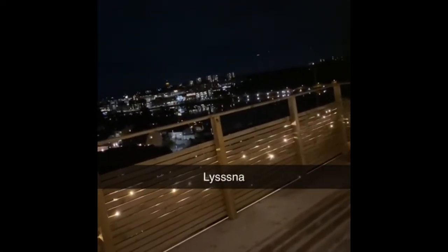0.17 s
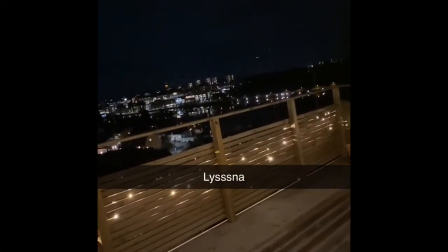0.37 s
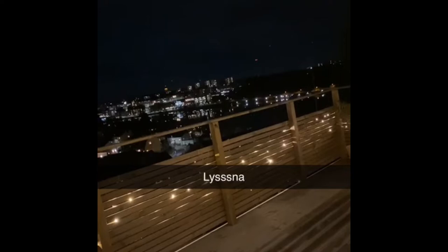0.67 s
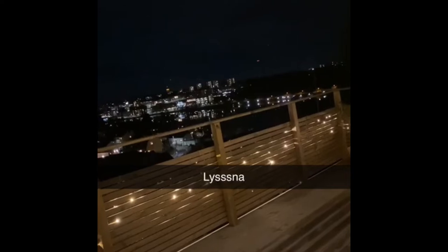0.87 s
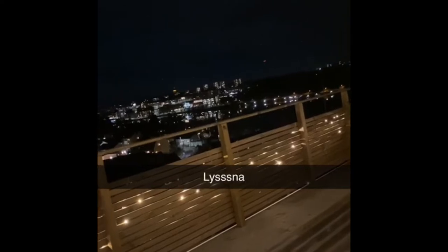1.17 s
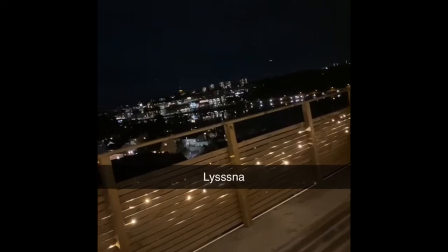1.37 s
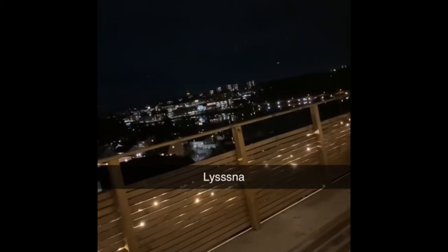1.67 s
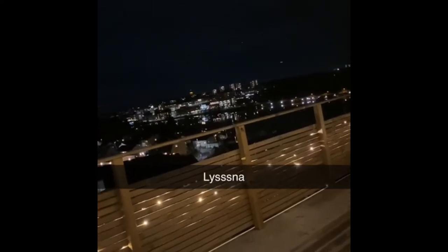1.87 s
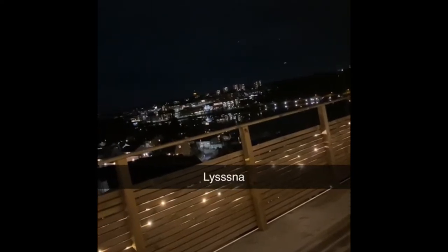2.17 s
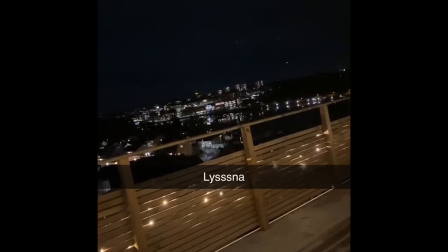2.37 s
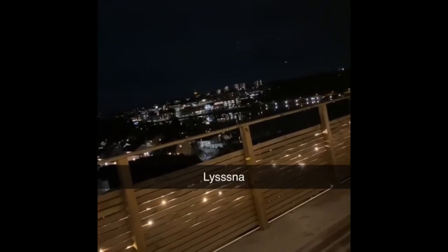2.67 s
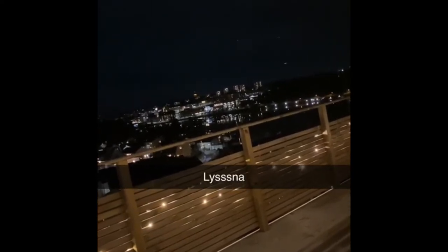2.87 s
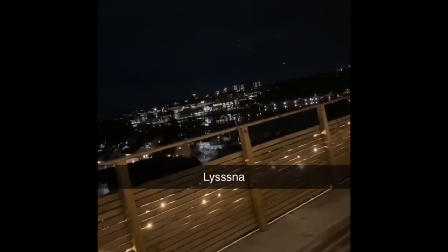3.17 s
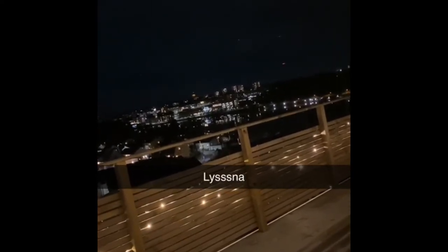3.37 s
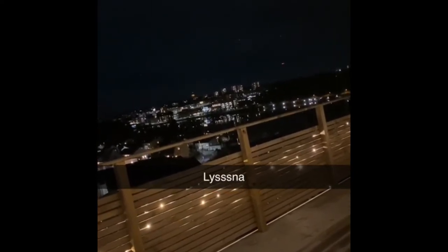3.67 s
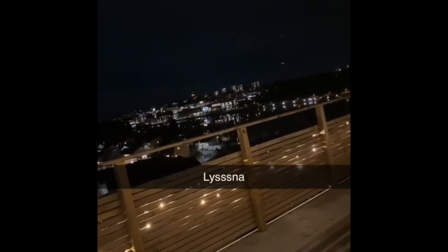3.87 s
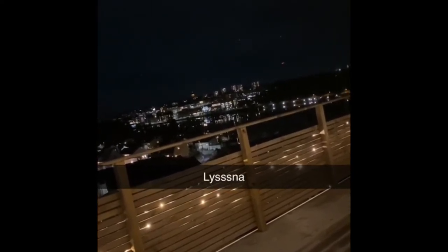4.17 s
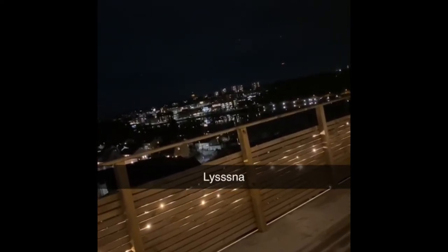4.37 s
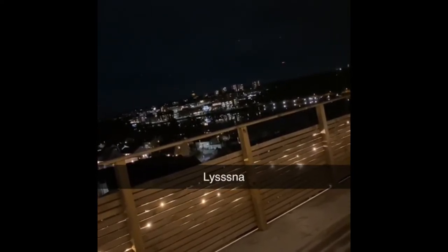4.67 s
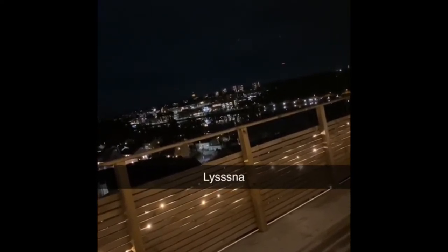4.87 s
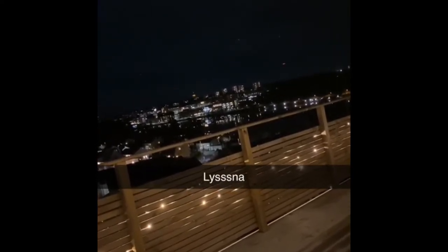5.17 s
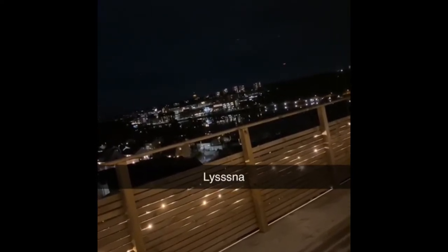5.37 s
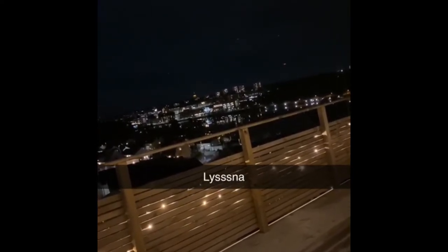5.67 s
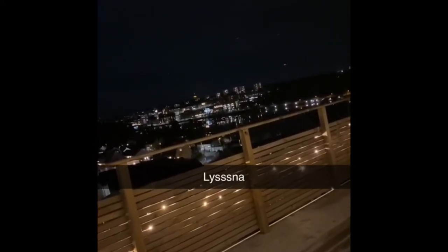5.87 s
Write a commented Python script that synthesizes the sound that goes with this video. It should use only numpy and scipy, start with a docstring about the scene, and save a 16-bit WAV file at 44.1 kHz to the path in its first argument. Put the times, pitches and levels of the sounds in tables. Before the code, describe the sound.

A fox screams three times at a distance, outdoors at night. Each scream starts as a hoarse rasp, clears into a high held note and falls away, echoing off houses and a hillside. Between the second and third screams, a small object gives one sharp click close to the microphone. A quiet, low town rumble runs underneath throughout.

```python
"""A red fox screams three times, some way off below a wooden terrace above a quiet town at night.
Each scream starts as a hoarse rasp, clears into a high held note and falls: the vocal folds shake
chaotically, lock on a pitch, then slacken, all coloured by the throat. Houses and hillside throw it back.
The town rumbles steadily, and close by something small clicks and rings."""
import sys
import numpy as np
from scipy import signal
from scipy.fft import rfft, irfft, next_fast_len
from scipy.io import wavfile
from scipy.ndimage import uniform_filter1d

SR = 44100
rng = np.random.default_rng(int(sys.argv[2]) if len(sys.argv) > 2 else 0)


def transcribe(signal):
    """Save signal, clipped to [-1, 1], as a 16-bit WAV file at the path in sys.argv[1]."""
    frames = np.atleast_2d(signal).T
    limited = np.clip(frames, -1, 1)
    pcm = np.round(limited * 32767).astype(np.int16)
    wavfile.write(sys.argv[1], SR, pcm)


N = 266011

# Tone of the distant town. Each row: frequency in Hz, relative level in dB.
TOWN_SPECTRUM = [(12, -46), (20, -14), (38, -3), (102, -0.5), (157, -5.5), (241, -8), (370, -19),
                 (401, -15.5), (649, -17.5), (944, -15.5), (1750, -34.5), (2160, -36.5), (3410, -41),
                 (6150, -45), (12000, -57), (15600, -83.5), (22000, -120)]
# Humps of far traffic and tyres on that tone. Each row: centre in Hz, width in Hz, boost or cut in dB.
TRAFFIC_HUMPS = [(90, 30, 0.5), (336, 86, 2), (411, 41, 2.5), (577, 60, -3), (856, 120, -3)]
# Small clicks close by. Each row: start in seconds, level in dB, decay in seconds, tilt in dB per octave.
CLICK_HITS = [(1.6448, -67.5, 0.005, 8), (4.9034, -30, 0.0033, 9), (4.9061, -31.5, 0.0035, -1),
              (4.9092, -29, 0.00097, -7), (5.6058, -63, .002, 3)]
# Tone of a click before its tilt. Each row: frequency in Hz, relative level in dB.
CLICK_SPECTRUM = [(290, -53), (500, -1), (1890, 7), (2190, -5.5), (2890, 5.5), (3670, -8), (4140, 9),
                  (5190, -8), (5850, -4), (6420, -3.5), (6770, -7), (9960, -11), (12000, -25.5),
                  (15600, -54), (22000, -120)]
# Ring of the clicked object. Each row: frequency in Hz, relative level in dB, seconds to fall 60 dB.
OBJECT_MODES = [(455, -26.5, 0.19), (576, -32, 0.2), (952, -25.5, 0.058), (1500, -27, 0.037),
                (1960, -31, 0.059), (4060, -39, 0.025), (5950, -36, .025)]
# Echoes off houses and hillside. Each row: delay in seconds, level in dB, smear in seconds,
# extra level for the low part of the voice in dB.
FAR_ECHOES = [(0.145, -1.5, 0.017, 1), (0.168, -14, 0.051, -5.5), (0.24, -16, 0.032, 2),
              (0.405, -14.5, .035, 3.5), (0.61, -24, 0.078, 6.5)]
# Bounce off ground and fences near the fox, with the same columns.
NEAR_ECHOES = [(0.003, -3, .028, -2)]
# The valley's long tail. Each row: frequency in Hz, seconds to fall 60 dB.
VALLEY_DECAY = [(800, 0.49), (2100, 3), (4300, 1.45), (7000, 1.5)]
# Throat resonances: low for rasp and moan, main for the note, upper for its overtones.
# Each row: centre in Hz, width in Hz, relative level in dB.
LOW_FORMANTS = [(996, 290, -8.5), (1113, 220, 0)]
MAIN_FORMANTS = [(1823, 690, -4), (2110, 160, -5)]
UPPER_FORMANTS = [(2950, 460, -4.5), (3540, 1200, 1), (4164, 320, 4.5), (4820, 600, -3), (5450, 340, -8.5),
                  (6130, 590, -15)]
# The screams. Each row: start and length in seconds, target pitch in Hz, climb in seconds, overshoot in
# Hz, hoarse stretch in seconds, roughness from 0 to 1, relative levels of rasp, hoarse note and clear
# note in dB, seconds from the start to the top of the swell, swell in dB.
FOX_SCREAMS = [(0.674, 0.81, 2200, 0.13, 0, 0.175, 0.86, -42.5, -49.5, -53.5, 0.56, 7.5),
               (3.426, 0.74, 2203, 0.082, 40, 0.095, 0.86, -42, -52, -54, 0.275, 15),
               (5.714, 0.75, 2172, 0.105, 0, 0.225, 0.5, -53.5, -48.5, -49, 0.27, 7.5)]

# The pitch scoops up from a fraction under the note, may overshoot, holds, then collapses.
SCOOP, OVERSHOOT_AT_S, OVERSHOOT_S = 0.28, 0.16, 0.0348
COLLAPSE, COLLAPSE_S = 1.3, 0.095
# Taut folds hold a steady note; slack ones quaver in pitch and flutter in loudness.
TAUT_HZ, SLACK_QUAVER, SLACK_FLUTTER_DB = 2227, .07, 12
# Hoarseness dies away; a little roughness stays in the held note, and more returns as the folds slacken.
CLEAR_S, HELD_ROUGH, SLACK_ROUGH = 0.073, 0.054, 0.36
# The rasp bites at once; the mouth opens more slowly and lets the note and its overtones out.
RASP_ATTACK_S, RASP_START_DB, OPEN_S, SHUT_DB, SWELL_S = 0.028, -18, 0.09, -27, 0.1
# The overtones duck with roughness and bloom as the note begins to sag.
OVERTONES_DB, OVERTONES_ROUGH_DB = -59, -4
BLOOM_DB, BLOOM_BEFORE_END_S, BLOOM_S = 4, 0.25, 0.08
# As the pitch falls the overtones fade first, then the note gives way to a low moan.
FALLEN_NOTE_DB, FALLEN_OVERTONES_DB, MOAN_DB = -25, -42, -59.5


def gain_of(db):
    """Decibels to amplitude."""
    return 10 ** (np.asarray(db) / 20)


def unit_rms(x):
    """Scales to rms 1."""
    return x / np.sqrt(np.mean(x ** 2) + 1e-20)


def curve_at(points, hz):
    """Reads a table on a log-frequency axis."""
    f, value = np.transpose(points)
    return np.interp(np.log(hz + 1), np.log(f + 1), value)


def add(mix, start_s, sound):
    """Drops a sound into the mix at start_s."""
    part = mix[round(start_s * SR):][:len(sound)]
    part += sound[:len(part)]


def eq(x, gain):
    """Filters x by a gain that is a function of frequency."""
    size = next_fast_len(len(x) + 4096)
    return irfft(rfft(x, size) * gain(np.fft.rfftfreq(size, 1 / SR)), size)[:len(x)]


def noise(count, gain):
    """Noise of rms 1, coloured by a gain curve."""
    return unit_rms(eq(rng.standard_normal(count), gain))


def wobble(count, hz):
    """Random motion of rms 1, no faster than about hz."""
    return noise(count, lambda f: 1 / (1 + (f / hz) ** 4))


def town(level_db=-50):
    """A steady bed of rumble and tyre wash from far away."""
    def colour(f):
        traffic_db = sum(db * np.exp(-(2 * (f - hz) / width) ** 2) for hz, width, db in TRAFFIC_HUMPS)
        return gain_of(curve_at(TOWN_SPECTRUM, f) + traffic_db)
    return gain_of(level_db) * noise(N, colour)


def clicks(scatter_db=-12, scatter_s=0.016, ring_db=-15, attack_s=0.00025):
    """Short cracks ring a small object and scatter off the nearby boards."""
    t = np.arange(SR // 5) / SR
    cracks = np.zeros(N)
    for start, db, decay, tilt in CLICK_HITS:
        grit = noise(len(t), lambda f: gain_of(curve_at(CLICK_SPECTRUM, f) + tilt * np.log2(f + 1)))
        envelope = np.exp(-t / decay) * (1 - np.exp(-t / attack_s))
        add(cracks, start, gain_of(db) * grit * envelope)
    ring = sum(gain_of(db - 60 * t / t60) * np.sin(2 * np.pi * hz * t) for hz, db, t60 in OBJECT_MODES)
    boards = rng.standard_normal(len(t)) * np.exp(-t / scatter_s)
    response = gain_of(ring_db) * ring + gain_of(scatter_db) * boards / np.linalg.norm(boards)
    return cracks + signal.fftconvolve(cracks, response)[:N]


def valley(x, tail_db=-11, build_s=0.03, air_hz=6000, flat_face=0.18, low_hz=1350):
    """Smeared echoes off walls and slopes, then a long scattered tail; the air dulls both."""
    t = np.arange(2 * SR) / SR
    hz, frame_s, spectrum = signal.stft(rng.standard_normal(len(t)), SR, nperseg=256)
    decay = gain_of(-60 * frame_s / curve_at(VALLEY_DECAY, hz)[:, None])
    tail = signal.istft(spectrum * decay, SR, nperseg=256)[1][:len(t)]
    tail *= 1 - np.exp(-t / build_s)
    response = gain_of(tail_db) * tail / np.linalg.norm(tail)
    for delay, db, smear, extra_db in NEAR_ECHOES + FAR_ECHOES:
        facets = rng.standard_normal(len(t)) * np.exp(-t / smear)
        facets[0] = flat_face * np.linalg.norm(facets)  # a flat face answers first, uneven ones after
        echo = np.zeros(len(t))
        add(echo, delay, facets / np.linalg.norm(facets))
        response += eq(echo, lambda f: gain_of(db + extra_db / (1 + (f / low_hz) ** 8)))
    wet = signal.fftconvolve(x, response)[:N]
    return eq(wet, lambda f: 1 / np.sqrt(1 + (f / air_hz) ** 4))


def throat(x, formants):
    """Steep-sided resonances, with the loudness that comes out held at 1."""
    def bell(f, hz, width):
        return 1 / (1 + (2 * (f - hz) / width) ** 2) ** 1.5
    voiced = eq(x, lambda f: sum(gain_of(db) * bell(f, hz, width) for hz, width, db in formants))
    running_power = abs(uniform_filter1d(voiced ** 2, size=1800))
    return voiced / np.sqrt(running_power + 1e-12)


def gesture(t, length, held_hz, climb_s, overshoot_hz, hoarse_s, roughness,
            rasp_db, hoarse_db, clear_db, swell_s, swell_db):
    """Rasp, held note, fall: curves for pitch, roughness and the levels of the three throat bands."""
    climb = 1 - SCOOP * np.exp(-(t / climb_s) ** 2)
    tension = 1 / (1 + COLLAPSE * np.exp((t - length) / COLLAPSE_S))
    overshoot = np.exp(-((t - OVERSHOOT_AT_S) / OVERSHOOT_S) ** 2)
    hz = held_hz * climb * tension + overshoot_hz * overshoot
    hoarse = np.exp(-np.maximum(t - hoarse_s, 0) / CLEAR_S)
    rough = HELD_ROUGH + (roughness - HELD_ROUGH) * hoarse + SLACK_ROUGH * (1 - tension)
    fallen = (2 * (1 - tension)) ** 2  # 0 on the held note, 1 an octave down
    mouth_db = SHUT_DB * np.maximum(1 - t / OPEN_S, 0)
    swell = np.exp(-((t - swell_s) / SWELL_S) ** 2)
    note_db = hoarse_db * hoarse + clear_db * (1 - hoarse)
    main_db = note_db + mouth_db + swell_db * swell + FALLEN_NOTE_DB * fallen ** 2
    onset_db = RASP_START_DB * np.maximum(1 - t / RASP_ATTACK_S, 0)
    low_db = 20 * np.log10(gain_of(rasp_db + onset_db) * hoarse + gain_of(MOAN_DB) * fallen ** 2)
    bloom = np.exp(-((t - length + BLOOM_BEFORE_END_S) / BLOOM_S) ** 2)
    upper_db = OVERTONES_DB + mouth_db + OVERTONES_ROUGH_DB * rough
    upper_db += BLOOM_DB * bloom + FALLEN_OVERTONES_DB * fallen
    return hz, np.clip(rough, 0, 1), low_db, main_db, upper_db


def scream(length, *manner, jitter=0.03, jitter_hz=150, waver=0.0013, quaver_hz=70, flutter_hz=55,
           shimmer=0.55, shimmer_hz=200, breath=0.7, doubling=1.35,
           low_trim_db=-4, main_trim_db=-3, upper_trim_db=-2.5):
    """Vocal folds, chaotic at first and then locked on a pitch, drive the resonances of the throat."""
    t = np.arange(0, length, 1 / SR)
    count = len(t)
    hz, rough, low_db, main_db, upper_db = gesture(t, length, *manner)
    slack = np.clip(1 - hz / TAUT_HZ, 0, .2)
    quaver = (waver + SLACK_QUAVER * slack) * wobble(count, quaver_hz)
    flutter_db = (0.5 + SLACK_FLUTTER_DB * slack) * wobble(count, flutter_hz)
    # chaos makes the cycles uneven in both length and strength
    uneven_rate = jitter * rough ** 2 * wobble(count, jitter_hz)
    uneven_strength = shimmer * rough * wobble(count, shimmer_hz)
    cycles = np.cumsum(hz * (1 + uneven_rate + quaver)) / SR
    harmonics = sum(np.cos(2 * np.pi * k * cycles) for k in range(1, 4))
    # when hoarse, strong and weak cycles alternate: tones appear halfway between the harmonics
    subharmonics = sum(np.cos(2 * np.pi * (k - .5) * cycles) for k in range(1, 4))
    folds = (harmonics + np.minimum(doubling * rough, 1) * subharmonics) / 2
    tone = (1 - rough) * folds * (1 + uneven_strength)
    # air escapes in a puff on every strong cycle; the hiss is strongest in the treble
    puffs = unit_rms((1.1 + np.cos(np.pi * cycles)) * rng.standard_normal(count))
    hiss = breath * rough * puffs
    low = gain_of(low_db + low_trim_db) * throat(tone + hiss / 3, LOW_FORMANTS)
    main = gain_of(main_db + main_trim_db + flutter_db) * throat(tone + hiss, MAIN_FORMANTS)
    upper_gain = gain_of(upper_db + upper_trim_db + 0.94 * flutter_db)
    upper = upper_gain * throat(tone + 1.32 * hiss, UPPER_FORMANTS)
    return (low + main + upper) * signal.windows.tukey(count, .02)


def scene():
    """The fox and its echoes, over the town, with the clicks in front."""
    fox = np.zeros(N)
    for start, length, *manner in FOX_SCREAMS:
        add(fox, start, scream(length, *manner))
    return (fox + valley(fox) + town() + clicks())[None]


def record(dry, bass_hz=32, top_hz=12000):
    """The microphone loses the deepest bass; a steep low-pass takes off the very top."""
    thinned = eq(dry[0], lambda f: 1 - 1 / (1 + (f / bass_hz) ** 6))
    low_pass = signal.firwin(255, top_hz, window=("kaiser", 8), fs=SR)
    return signal.oaconvolve(thinned, low_pass, "same")[None]


dry = scene()
out = record(dry)
transcribe(out)
```